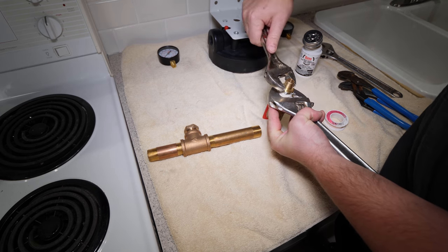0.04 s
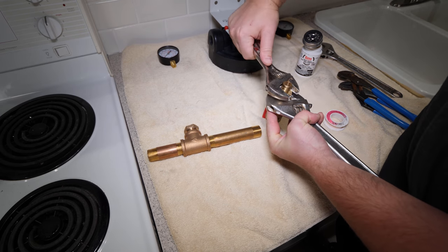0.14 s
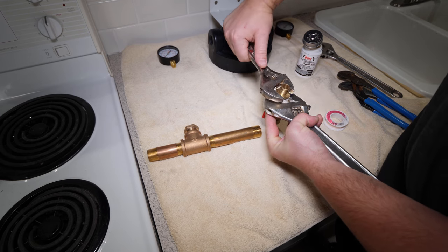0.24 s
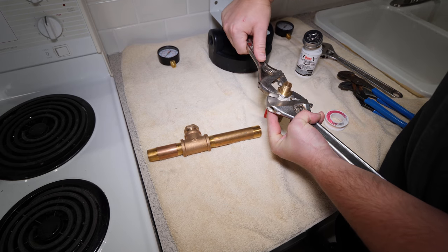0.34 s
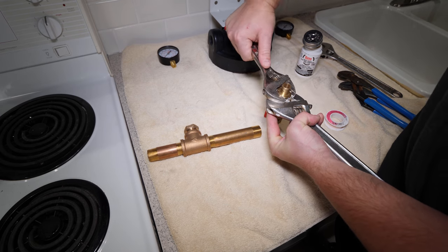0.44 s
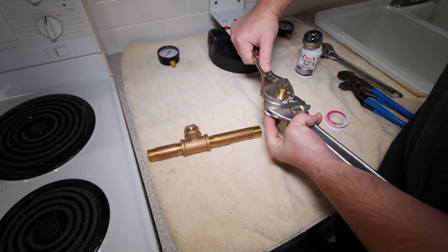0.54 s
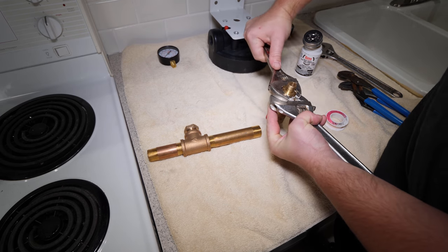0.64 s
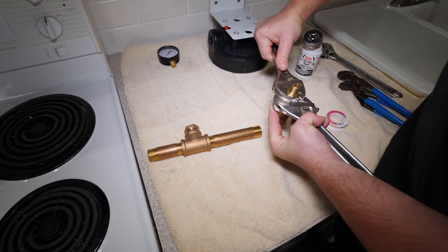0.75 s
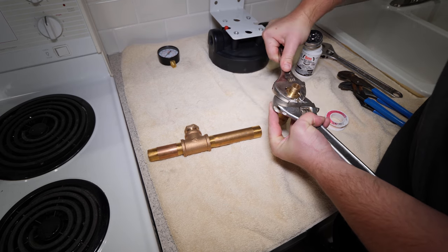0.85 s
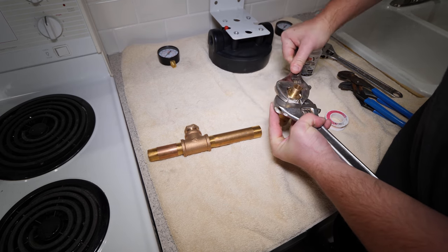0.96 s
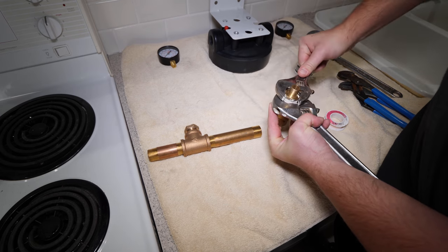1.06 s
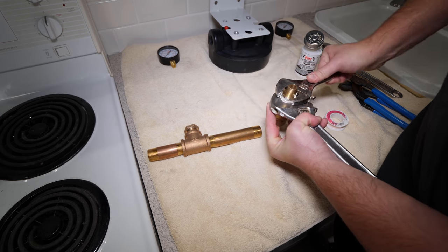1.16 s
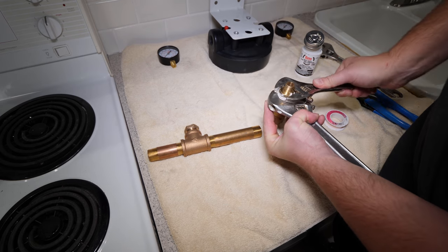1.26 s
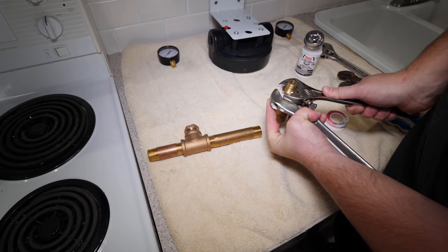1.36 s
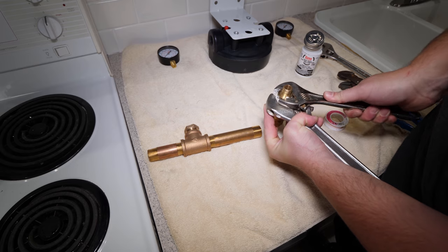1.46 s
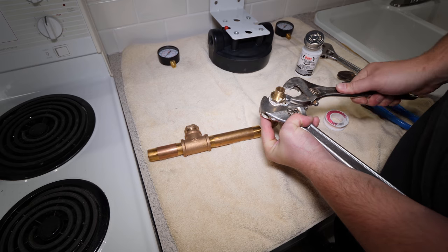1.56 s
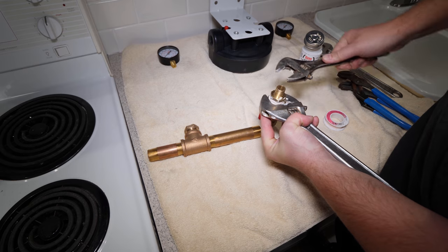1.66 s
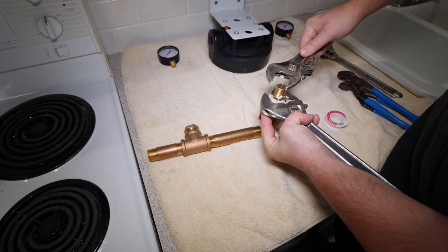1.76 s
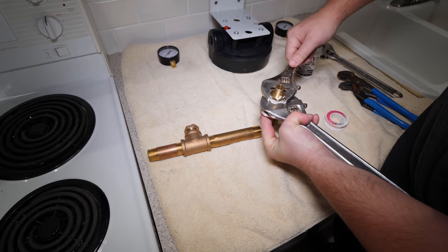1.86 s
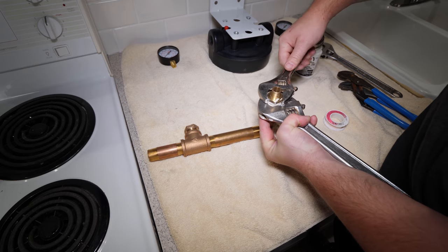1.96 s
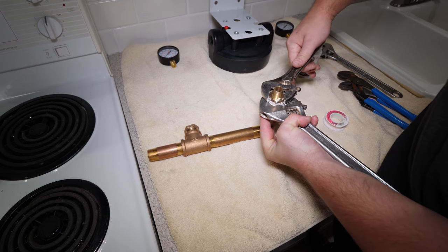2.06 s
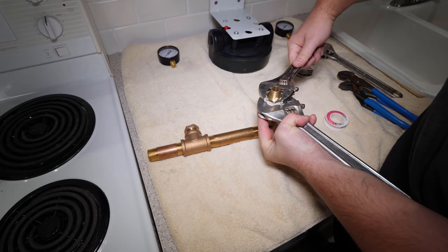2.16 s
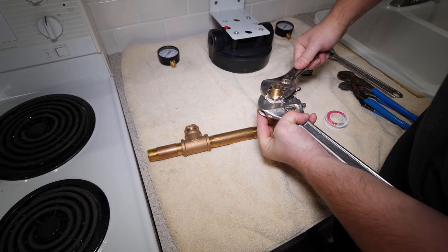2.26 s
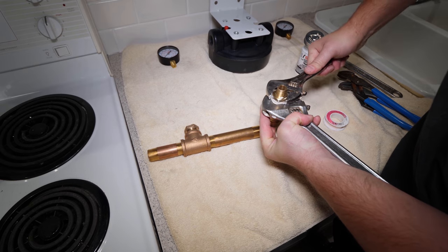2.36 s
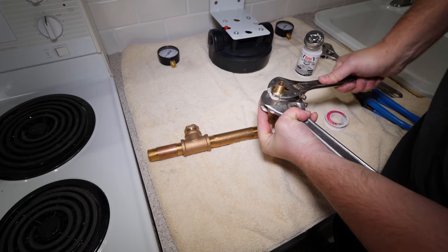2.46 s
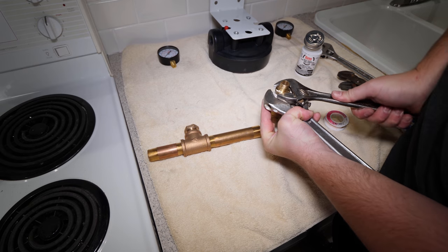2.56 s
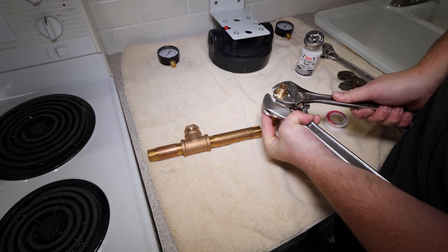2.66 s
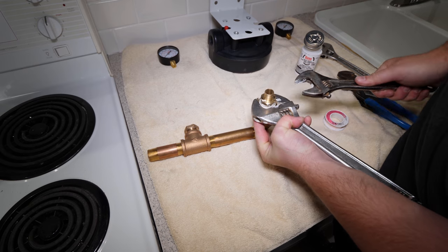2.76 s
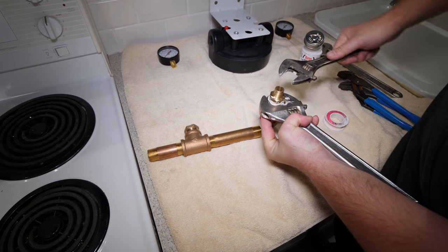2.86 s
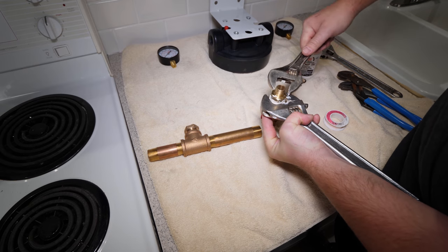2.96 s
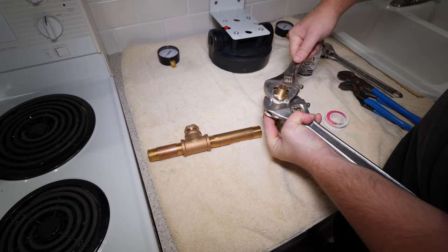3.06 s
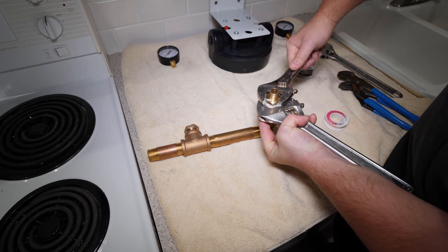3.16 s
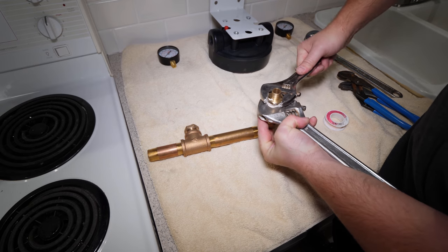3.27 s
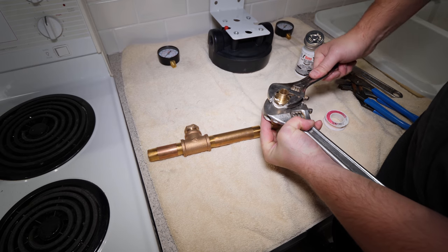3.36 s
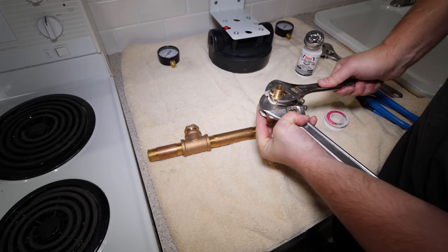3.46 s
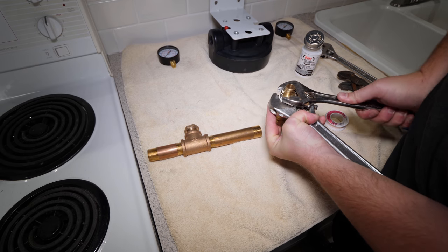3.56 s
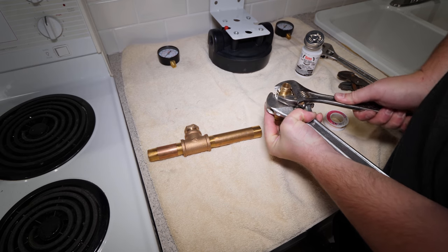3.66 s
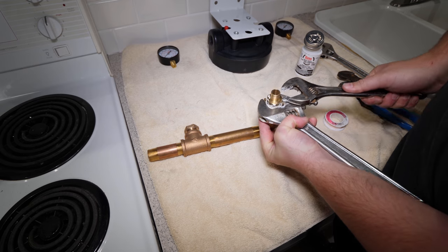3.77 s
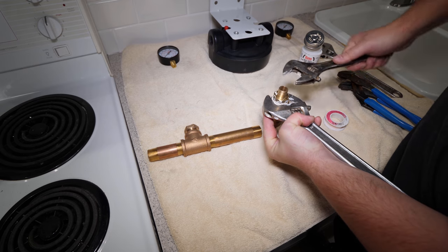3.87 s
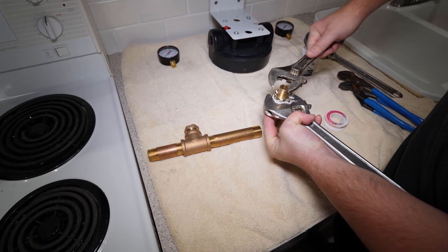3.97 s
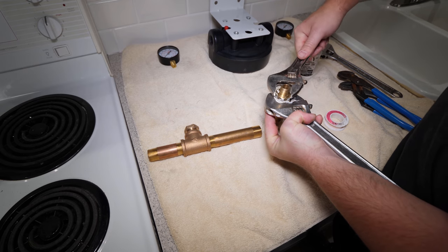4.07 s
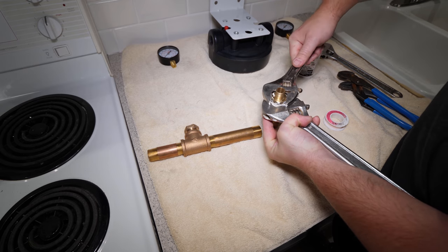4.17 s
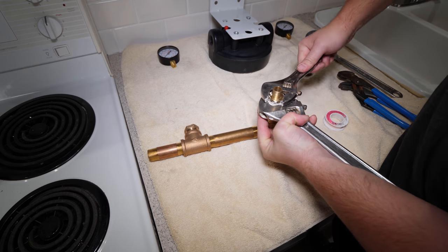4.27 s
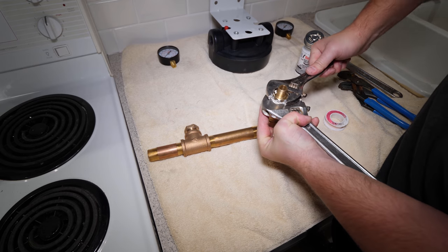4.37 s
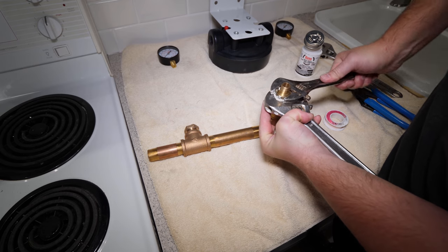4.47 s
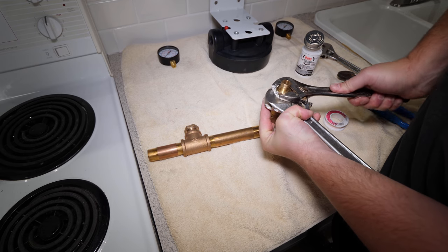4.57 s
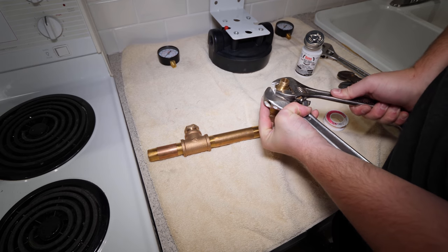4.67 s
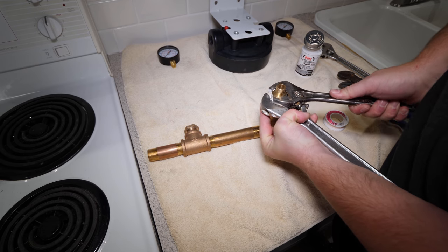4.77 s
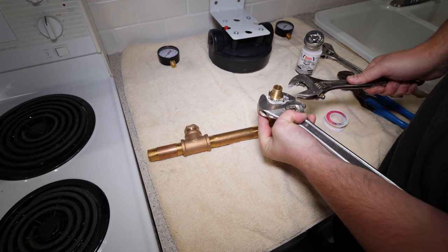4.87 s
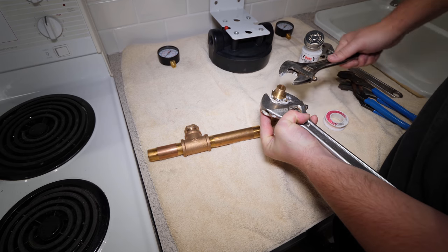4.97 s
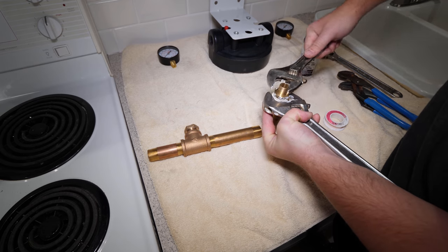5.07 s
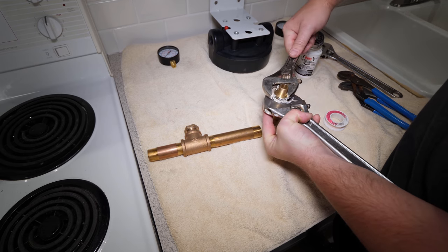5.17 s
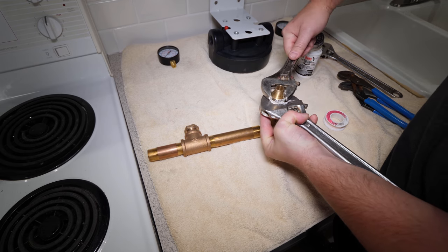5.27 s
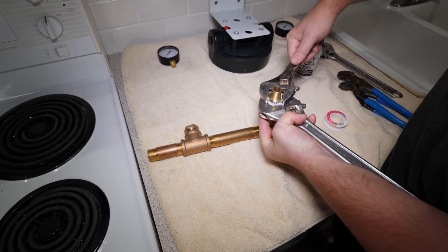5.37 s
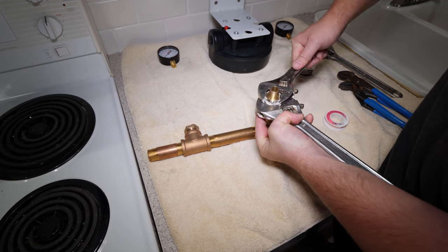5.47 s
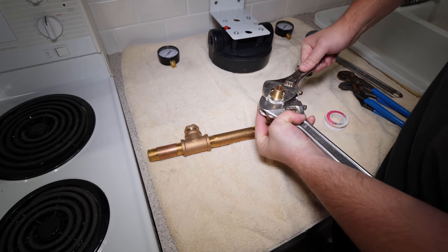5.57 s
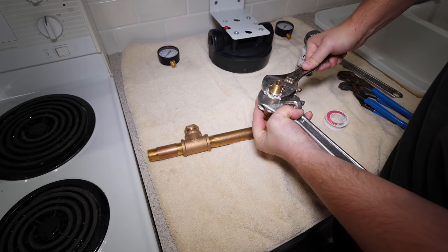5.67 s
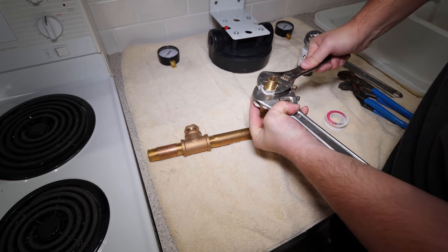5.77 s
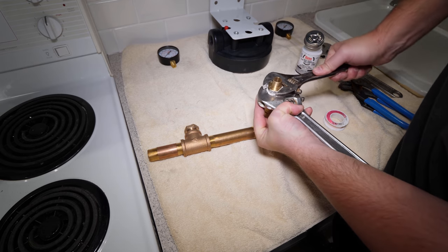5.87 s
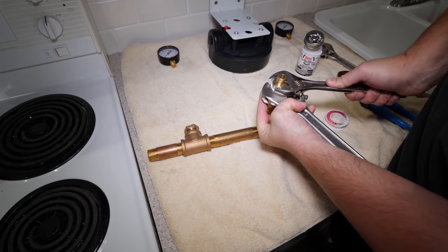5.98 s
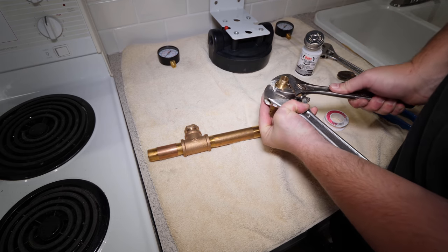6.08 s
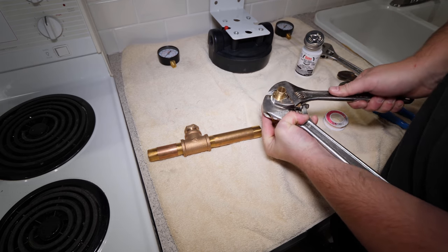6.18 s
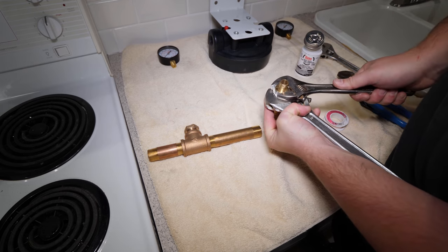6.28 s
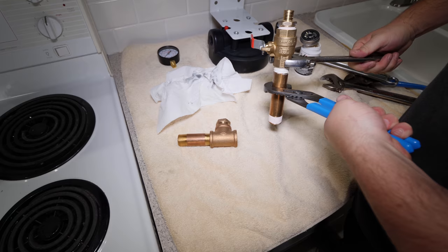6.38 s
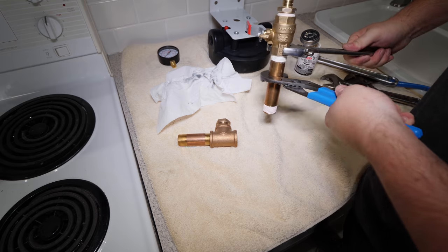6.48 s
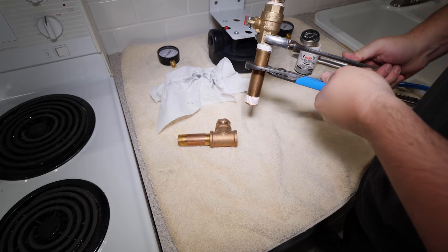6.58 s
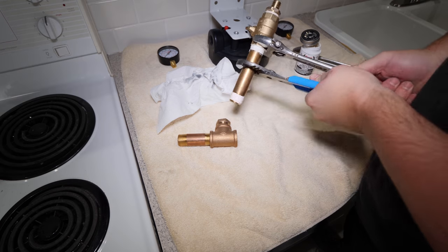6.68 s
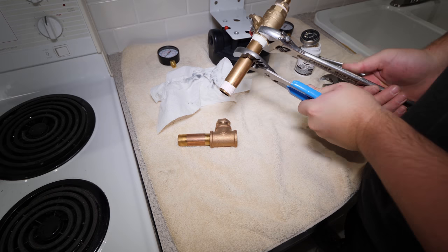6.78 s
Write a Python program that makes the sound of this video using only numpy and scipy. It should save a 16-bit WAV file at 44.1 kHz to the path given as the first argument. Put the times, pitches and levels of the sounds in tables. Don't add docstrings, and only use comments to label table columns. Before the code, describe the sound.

Close stereo sound in a tiled kitchen with faint room tone and a soft appliance hum. A wrench works a hand-damped brass fitting a little right of centre. At 0.14 s a sharp clank with a scrape, then hollow worktop bumps and the hardest crack at 0.36, followed by knocks to 0.5. A freer clink rings thinly at 1.08, with light sliding after. Clattering clusters come at 1.6 and 1.8-2.0, faint ticks and rasps around 2.3-2.8, then a tight group of hard knocks at 3.0-3.1. Dry slides at 3.5-3.8 lead to clacks at 4.0-4.3, small chatter at 4.9-5.3 and a last bright clank at 5.42. Afterwards only faint dragging, a soft bump near 6.2 and tiny ticks at 6.7-6.8, farther right. Hard blows thud through the hollow cupboard, leave short bright tails and momentarily duck the level.

```python
import sys
import numpy as np
from scipy import signal
from scipy.io import wavfile
from scipy.ndimage import uniform_filter1d, minimum_filter1d

SR = 44100
rng = np.random.default_rng(int(sys.argv[2]) if len(sys.argv) > 2 else 0)


def inscribe(sig):
    pcm = np.round(np.clip(np.atleast_2d(sig).T, -1, 1) * 32767)
    wavfile.write(sys.argv[1], SR, pcm.astype(np.int16))


def amplitude_ratio(level_db):
    exponent = np.asarray(level_db, float) / 20
    return 10 ** exponent


N = 301203


def evened(x):
    return x / np.sqrt(np.mean(x ** 2) + 1e-20)


def read(points, hz):
    f, value = np.transpose(points)
    return np.interp(np.log(hz + 1), np.log(f + 1), value)


def add(mix, s, sound):
    part = mix[round(s * SR):][:len(sound)]
    part += sound[:len(part)]


def band(x, lo_hz, hi_hz):
    edges_hz = [lo_hz, min(hi_hz, SR / 2 - 100)]
    return signal.sosfilt(signal.butter(2, edges_hz, "band", fs=SR, output="sos"), x)


def ring(modes, t, luck, spread_db, detune, rise_s):
    hz, db, t60 = np.transpose(modes)[:, :, None]
    level_luck = luck[:len(modes), None]
    pitch_luck = luck[::-1][:len(modes), None]
    envelope = amplitude_ratio(db + spread_db * level_luck - 60 * t / t60)
    x = (envelope * np.sin(2 * np.pi * hz * (1 + detune * pitch_luck) * t)).sum(0)
    x = x * (1 - np.exp(-t / rise_s))
    return x / abs(x).max()


def resonate(x, peaks):
    return evened(sum(amplitude_ratio(db) * signal.lfilter(*signal.iirpeak(hz, hz / w, SR), x) for hz, w, db in peaks))


def drift(span_s, count):
    steps = rng.standard_normal((count, N // 64 + 2))
    steps = uniform_filter1d(steps, size=round(span_s * SR / 64), axis=1)
    at = np.arange(steps.shape[1])
    return np.array([np.interp(np.arange(N) / 64, at, evened(row)) for row in steps])


def wander(x, peaks, bend, flicker_db):
    hz, width, db = np.transpose(peaks)
    moving_hz = hz[:, None] * (1 + bend * drift(.12, count=len(hz)))
    turn = np.exp(2j * np.pi * np.cumsum(moving_hz, axis=1) / SR)
    decay = np.exp(-np.pi * width / SR)
    out = [signal.lfilter([np.sqrt(1 - r)], [1, -r], x / w) * w for r, w in zip(decay, turn)]
    level = amplitude_ratio(db[:, None] + flicker_db * drift(0.05, count=len(hz)))
    return evened((level * np.real(out)).sum(0))


def air():
    # frequency in Hz, level in dB per Hz.
    tone = [(18, -75.5), (30, -51), (217, -14), (368, -9), (533, -9), (659, -8), (772, -8), (979, -9),
            (1380, -19), (1490, -14), (4070, -20.5), (14800, -25.5), (16500, -24.5)]
    # frequency in Hz, left-right likeness from 0 to 1.
    likeness = [(60, 0.89), (240, 1.0), (950, 0.93), (3770, 0.26), (15000, 0.8)]
    # frequency in Hz, level in dB.
    appliance = [(177.6, -83), (376.8, -85.5), (651.4, -83.5)]
    tone_db = -69.5
    frames, hz = N // 256 + 5, np.fft.rfftfreq(1024, 1 / SR)
    a, b, c, d, patches = rng.standard_normal((frames, 513, 5)).T
    patches = uniform_filter1d(patches, size=12, axis=0)
    patches = evened(uniform_filter1d(patches, size=14, axis=1))
    same = np.clip(read(likeness, hz), -1, 1)[:, None]
    left = a + 1j * b
    right = same * left + np.sqrt(1 - same ** 2) * (c + 1j * d)
    z = np.array([left, right]) * amplitude_ratio(read(tone, hz)[:, None] + 1.8 * patches)
    hiss = evened(signal.istft(z, nperseg=1024, noverlap=768)[1][:, :N])
    waver = rng.standard_normal(N)
    hum = sum(amplitude_ratio(db) * resonate(waver, [(f, 6.0, 0)]) for f, db in appliance)
    return amplitude_ratio(tone_db) * hiss + hum


def kitchen(x, shared):
    # frequency in Hz, reverberation t60 in seconds.
    decay = [(100, 0.61), (500, 0.36), (1500, 0.44), (3000, 0.42), (6000, 0.39), (11000, 0.31),
             (16000, 0.25)]
    taps = np.zeros((3, SR))
    slots = np.arange(300, SR - 20, 20)
    at = slots + rng.integers(0, 20, (3, len(slots)))
    np.put_along_axis(taps, at, rng.choice([-1., 1.], at.shape), 1)
    hz, t, z = signal.stft(taps, SR, nperseg=256)
    tail = signal.istft(z * amplitude_ratio(-60 * t / read(decay, hz)[:, None]), SR, nperseg=256)[1]
    tail = shared * tail[2] + np.sqrt(1 - shared ** 2) * tail[:2]
    return signal.fftconvolve(x[None], tail / np.linalg.norm(tail[0]), axes=1)[:, :N]


def counter():
    # start in seconds, hollow panel, low thud and board levels in dB.
    passed_on = [(0.054, -52.5, -60, -53), (0.137, -34, -52, -38), (0.159, -41.5, -54.5, -44.5),
                 (0.353, -44.5, -44, -53.5), (0.448, -42.5, -56.5, -41), (0.487, -47.5, -73.5, -54),
                 (1.609, -61.5, -77, -60), (1.837, -54, -68.5, -53), (1.876, -41.5, -64, -35.5),
                 (1.995, -49, -58.5, -50), (2.285, -62, -85.5, -51.5), (2.745, -57.5, -63, -56),
                 (3.006, -54, -84, -71), (3.038, -54.5, -84, -46), (3.083, -49, -77.5, -48.5),
                 (3.111, -41.5, -57, -38.5), (3.774, -64, -74, -63), (4.016, -56, -70.5, -41),
                 (4.071, -55, -68, -46.5), (4.135, -56, -65.5, -44), (4.257, -53.5, -58, -50),
                 (4.896, -59.5, -76, -56.5), (5.182, -51, -64.5, -44.5), (5.275, -56, -62.5, -46),
                 (5.337, -51, -60, -45.5), (5.417, -41, -55, -64), (0.958, -56, -76, -71),
                 (6.708, -66, -83, -63.5)]
    # start in seconds, hollow panel and low thud levels in dB.
    bumps = [(0.106, -52.5, -67), (0.199, -72, -66), (0.284, -43.5, -57.5), (0.321, -43.5, -56.5),
             (0.339, -31.5, -61), (0.523, -43, -64), (0.564, -78, -61.5), (0.855, -48.5, -70),
             (0.978, -62, -71.5), (2.029, -47, -60), (2.513, -63, -67), (2.582, -58.5, -80.5),
             (3.219, -57, -63.5), (4.844, -59, -73.5), (6.2, -77, -75)]
    # frequency in Hz, level in dB, t60 in seconds.
    panel_modes = [(600.5, -0.21, 0.073), (660.5, -1.8, 0.075)]
    thud_modes = [(137, -5.5, 0.092), (212.8, 0, 0.092), (248.5, 5.5, 0.063), (326, 1, 0.084),
                  (432, 2, 0.078)]
    board_modes = [(880, -3, .022), (1200, -3, .018), (1600, 0, .02), (1950, -1, .018)]
    padded_db = -16.5
    out, t = np.zeros(N), np.arange(8000) / SR
    knocks = sorted(passed_on + [(s, panel_db, thud_db, panel_db + padded_db) for s, panel_db, thud_db in bumps])
    luck = rng.standard_normal((len(knocks), 8))
    for (s, panel_db, thud_db, board_db), z in zip(knocks, luck):
        panel = amplitude_ratio(panel_db) * ring(panel_modes, t, z, 11.0, 0.013, 0.002)
        thud = amplitude_ratio(thud_db + 9.5) * ring(thud_modes, t, z, 0.94, .07, 0.041)
        board = amplitude_ratio(board_db + 10.0) * ring(board_modes, t, z, 0.37, 0.071, 0.00075)
        add(out, s, panel + thud + board)
    return out


def slides():
    # full contact in seconds, hold in seconds, handle hum, jaw rasp and fine hiss levels in dB.
    strokes = [(0.121, .01, -39.5, -45, -59.5), (0.295, 0.075, -43.5, -55.5, -59),
               (1.132, 0.13, -63, -57, -65.5), (1.296, 0.13, -67.5, -72, -70),
               (1.544, 0.066, -65.5, -77.5, -68.5), (2.443, 0.043, -68, -60, -62),
               (2.496, 0.011, -76, -49, -63), (2.548, 0.056, -61, -56, -59.5),
               (2.747, 0.0066, -66, -58, -64.5), (2.829, 0.0046, -57, -61.5, -82),
               (3.463, 0.0055, -52, -47.5, -56), (3.503, 0.07, -54.5, -50, -62),
               (3.624, 0.036, -69, -72.5, -66), (3.773, .015, -55, -64.5, -63.5),
               (3.753, 0.28, -66, -67, -76), (4.183, .005, -38.5, -57, -64.5),
               (4.495, 0.085, -70, -60, -66.5), (5.143, 0.0041, -41, -52.5, -77),
               (5.23, 0.093, -45.5, -76, -69), (5.787, 0.22, -67.5, -70, -77),
               (6.099, 0.22, -81, -73.5, -92), (6.724, 0.063, -72, -65, -68.5),
               (6.798, .03, -75, -64, -64.5)]
    # frequency in Hz, width in Hz, level in dB.
    rasp_peaks = [(3750, 110, -2), (4150, 90, 1), (5050, 120, -4), (5550, 90, 0)]
    hiss_peaks = [(6950, 100, -3), (7600, 100, -2), (8600, 70, 3), (9900, 80, 0), (12200, 120, -3),
                  (13300, 120, -6)]
    grip_db_per_s, let_go_db_per_s = 329.5, 257.5
    t = np.arange(N) / SR
    grain = rng.standard_normal(N)
    catch = amplitude_ratio(1.5 * np.minimum(rng.exponential(1, N), 3.5))
    catch = catch * (rng.random(N) < 900 / SR)
    slips = grain * (0.5 + catch)
    slips = evened(slips * amplitude_ratio(1.6 * drift(.006, count=1)[0]))
    hum = wander(slips, [(2600, 100, -2), (2350, 160, -10.5)], 0.0092, 3.6)
    rasp = wander(slips, rasp_peaks, .015, 4.0) + .4 * evened(band(slips, 3200, 8000))
    hiss = wander(slips, hiss_peaks, .008, 6.0) + .8 * evened(band(slips, 6500, 16000))
    power = np.zeros((3, N))
    for s, hold, *levels_db in strokes:
        loose_db = grip_db_per_s * np.maximum(s - t, 0) + let_go_db_per_s * np.maximum(t - s - hold, 0)
        power += amplitude_ratio(2 * np.array(levels_db))[:, None] * amplitude_ratio(-2 * loose_db)
    return amplitude_ratio(-9.5) * (np.sqrt(power) * (hum, rasp, hiss)).sum(0)


def rings():
    # start in seconds, frequency in Hz, level in dB.
    loose = [(0.139, 11560, -24), (0.16, 11585, -22.5), (0.16, 4840, -24), (0.153, 7900, -30),
             (0.16, 10330, -29), (0.355, 6740, -19), (0.355, 10100, -20.5), (0.355, 11800, -24.5),
             (0.355, 4830, -14), (0.45, 5170, -24), (0.49, 2830, -30.5), (0.496, 5140, -27),
             (1.645, 4823, -30.5), (1.645, 7820, -33), (1.62, 3280, -30), (1.645, 10170, -37),
             (1.826, 4880, -24.5), (1.836, 4840, -22.5), (1.826, 7780, -24), (1.836, 5800, -33.5),
             (1.836, 10034, -31.5), (1.836, 11500, -26), (1.908, 5700, -30), (1.895, 4930, -27.5),
             (2.286, 2283, -38), (2.286, 4300, -40.5), (2.93, 7400, -43), (2.93, 7040, -44.5),
             (3.01, 4823, -32.5), (3.01, 11600, -24), (3.042, 7300, -34), (3.042, 10100, -30.5),
             (3.042, 11700, -26), (3.116, 5700, -26.5), (3.116, 3680, -29), (4.018, 7924, -31),
             (4.018, 10270, -29), (4.025, 12446, -25), (4.018, 4750, -33), (4.071, 5650, -30),
             (4.071, 7924, -36.5), (4.071, 10150, -39), (4.14, 3740, -33), (4.14, 5685, -43),
             (4.26, 5470, -47), (4.9, 3156, -30.5), (4.906, 6374, -42), (4.906, 4880, -33.5),
             (4.906, 7830, -42), (5.093, 3170, -36.5), (5.093, 4960, -35.5), (5.093, 6158, -42.5),
             (5.277, 7235, -34.5), (5.277, 11400, -30.5), (5.277, 4850, -30), (5.338, 3540, -34),
             (5.338, 7666, -41), (5.338, 10140, -30.5), (5.42, 3700, -23), (5.42, 5770, -22)]
    # start in seconds,
    # frequency in Hz, level in dB, t60 in seconds.
    free = [(3.085, 11500, -23.5, 0.15), (0.355, 3050, -19, .015), (0.355, 9400, -24, .03),
            (1.614, 11500, -26, .05), (0.14, 2720, -24, .04), (5.42, 2690, -29.5, .03),
            (3.085, 5700, -27.5, .02), (1.942, 3200, -32, 0.016), (2.286, 940, -43.5, 0.04),
            (1.078, 4500, -32, 0.027), (0.161, 2720, -28, .04), (0.322, 596, -37.5, .15),
            (1.078, 7795, -40, 0.27), (1.078, 7149, -45, .2), (1.078, 11025, -51, .15),
            (1.2, 4980, -66.5, .6), (5.42, 1593, -35.5, 0.048), (5.338, 1809, -39, 0.036)]
    loose_t60_s = 0.027
    out, t = np.zeros(N), np.arange(SR // 2) / SR
    for s, hz, db, t60 in [(*row, loose_t60_s) for row in loose] + free:
        cluster = [(hz, 0, t60), (1.008 * hz, -5, t60), (.99 * hz, -8, t60)]
        add(out, s, amplitude_ratio(db) * ring(cluster, t, np.zeros(3), 0, 0, .001))
    return out


def pliers():
    # start in seconds, level in dB.
    clink = (1.076, -17.5)
    # frequency in Hz, level in dB, t60 in seconds.
    modes = [(2236, -14, 0.032), (4180, -11, 0.02), (4520, 3, 0.019), (4970, -32.5, 0.88),
             (5400, -3.5, 0.021), (5730, -3, 0.022), (6900, -12.5, 0.026), (7280, -11, .04),
             (7970, -11, 0.049), (8840, -23, 0.035), (11400, -14.5, 0.026), (12360, -54, .5),
             (14080, -12, 0.03)]
    out, t = np.zeros(N), np.arange(SR // 2) / SR
    crack = band(rng.standard_normal(len(t)) * np.exp(-t / 0.0024), 2000, 12000)
    metal = ring(modes, t, np.zeros(len(modes)), 0, 0, 0.00017)
    add(out, clink[0], amplitude_ratio(clink[1]) * (metal + 0.051 * crack))
    return out


def tools():
    # frequency in Hz, level in dB, t60 in seconds.
    handle_modes = [(2590, 0, .021), (2650, -3, .017), (2540, -6, .017), (2440, -16, .02)]
    jaw_modes = [(3280, -20, .01), (4850, -24, .012), (5820, -22, .008), (6400, -22, .008)]
    nut_modes = [(7800, -17, .008), (10100, -17, .008)]
    # start in seconds, handle ring in dB, jaw in dB, jaw pitch in Hz, nut in dB.
    on_rim = [(0.139, -12.5, -11, 5020, -10.5), (0.153, -36.5, -30, 4900, -20),
              (0.16, -25, -21, 4660, -18.5), (1.6137, -43.5, -19, 3170, -8.5),
              (1.631, -51, -25, 4960, -38.5), (1.823, -49.5, -33.5, 4500, -33.5),
              (1.825, -47, -16, 5000, -11.5), (1.8355, -35.5, -23.5, 4900, -17),
              (2.929, -34, -32.5, 6570, -25.5), (2.9915, -35.5, -28, 4770, -19),
              (3.01, -27, -23, 5420, -13.5), (3.034, -28, -37.5, 4600, -31),
              (3.042, -25.5, -16, 5000, -10.5), (3.083, -19, -6, 4500, -1.5),
              (3.092, -35.5, -23.5, 3800, -23.5), (3.114, -19, -17.5, 4530, -34),
              (4.018, -16, -14, 2930, -9), (4.0245, -37, -27, 5670, -13), (4.071, -36, -17, 5190, -26),
              (5.276, -28.5, -17, 5200, -20), (6.71, -61, -57, 5400, -62)]
    on_body = [(0.033, -51.5, -36, 3000, -54.5), (0.056, -44.5, -37, 4800, -35),
               (0.341, -37, -33, 4840, -49), (0.4505, -32, -14, 5050, -15.5), (0.496, -50, -25, 5240, -45),
               (1.572, -63, -54.5, 5270, -76), (1.619, -47.5, -25, 3300, -30.5),
               (1.6215, -54, -31, 3380, -23.5), (1.648, -40.5, -32, 4870, -24),
               (1.6443, -42, -28, 4860, -22), (1.89, -40, -16, 5160, -29.5), (2.402, -89, -39.5, 3830, -78),
               (2.597, -52, -48.5, 4400, -44), (2.752, -44, -44, 5300, -55), (3.434, -50, -29, 3740, -68),
               (3.542, -65, -37.5, 4200, -45), (3.7975, -38, -44, 4970, -47),
               (3.948, -34.5, -31.5, 5850, -28), (2.479, -75, -48.5, 5000, -60),
               (4.931, -33.5, -38, 5000, -31.5), (4.846, -37.5, -45, 3100, -56),
               (4.898, -54, -27, 3150, -20.5), (4.905, -35, -26.5, 4900, -24.5),
               (4.925, -35, -33, 4800, -31.5), (5.097, -58, -33.5, 5100, -34.5),
               (5.285, -28.5, -29, 4870, -32)]
    on_flat = [(0.355, -15, 4, 4760, 6.5), (1.877, -41, -6.5, 5570, -8), (1.8945, -29, -15, 5140, -27.5),
               (1.9075, -59, -20.5, 5600, -40), (1.941, -36.5, -24, 4920, -40),
               (1.985, -41.5, -21.5, 5910, -25), (2.5, -67, -40, 3650, -65), (2.515, -65, -42, 4790, -64),
               (2.9, -55.5, -54.5, 4700, -45.5), (2.906, -54, -46, 4770, -44), (1.46, -85, -75, 4980, -64),
               (4.089, -32, -46.5, 4600, -32.5), (4.14, -25, -18, 5200, -20.5),
               (3.9395, -36.5, -39.5, 5230, -39), (4.26, -39.5, -21.5, 5400, -21.5),
               (4.91, -46, -29, 5120, -26.5), (5.093, -34, -30.5, 3050, -33.5),
               (5.337, -24, -20.5, 5150, -20.5), (6.815, -81, -51, 3130, -61), (6.824, -72, -37, 3400, -68)]
    on_corner = [(0.9715, -71, -54, 5180, -57), (1.565, -83.5, -60, 5400, -58),
                 (1.74, -69.5, -45, 4820, -43), (2.2, -64, -57, 4500, -63), (2.775, -80, -71, 5030, -60),
                 (4.835, -70, -62, 5000, -57), (5.1, -48, -35, 5160, -45), (5.21, -46, -54, 3280, -59),
                 (0.489, -34.5, -21, 5100, -28), (1.997, -59, -28.5, 5340, -21),
                 (2.285, -30, -28.5, 4220, -33.5), (2.58, -49, -43, 5530, -41.5),
                 (2.727, -65.5, -54.5, 3250, -45), (2.755, -39, -49, 5160, -52.5),
                 (3.772, -43.5, -46, 5370, -55), (4.489, -59.5, -56, 4240, -53),
                 (0.292, -51.5, -42, 4800, -48.5), (4.874, -57.5, -42, 3100, -56),
                 (5.183, -37, -28.5, 2980, -46), (5.185, -30, -31.5, 5070, -39.5),
                 (5.419, -24.5, -5, 5184, -1.5)]
    extra_ticks = [
        (3.1176, -32, -25, 4300, -30),
        (4.2522, -60, -52, 4500, -44),
        (0.3605, -35.5, -20, 5000, -20),
        (4.1375, -30, -24.5, 5900, -30.5),
        (2.4, -60, -44, 3400, -58),
        (4.0485, -46, -40, 4800, -34.5),
        (3.22, -50, -44, 4400, -52),
        (0.556, -52, -40, 3200, -56),
    ]
    flat_hz = 9950
    places = (on_rim, 11350), (on_body, 7710), (on_flat, flat_hz), (on_corner, 11800)
    out, t = np.zeros((2, N)), np.arange(3000) / SR
    blows = sorted((*row, nut_hz) for rows, nut_hz in places for row in rows)
    luck = rng.standard_normal((len(blows), 16 + 800))
    blows = blows + [(*row, flat_hz) for row in extra_ticks]
    luck = np.vstack([luck, -luck])
    snap = np.arange(len(t)) == 30
    burst = np.exp(-t[:800] / 0.0011) * (1 - np.exp(-t[:800] / 0.0026))
    for (s, handle_db, jaw_db, jaw_hz, nut_db, nut_hz), z in zip(blows, luck):
        crack = np.pad(z[16:] * burst, (0, len(t) - 800))
        clatter = amplitude_ratio(7.0 + .38 * (max(jaw_db, nut_db) + 25))
        crack = crack + .05 * clatter * snap
        crack = np.array([crack, np.linalg.norm(crack) * snap])
        handle = ring(handle_modes, t, z[:16], 3.0, .008, .0016) + .4 * band(crack, 1500, 3100)
        jaw = ring([(jaw_hz, 0, .005)] + jaw_modes, t, z[:16], 5.0, .025, .0004)
        jaw = jaw + clatter * (band(crack, 0.53 * jaw_hz, 1.26 * jaw_hz) + 1.35 * band(crack, 2160, 7800))
        nut = ring([(nut_hz, 0, .006)] + nut_modes, t, z[2:16], 5.0, .012, .0003)
        nut_clatter = band(crack, 0.7 * nut_hz, 1.1 * nut_hz) + 1.5 * band(crack, 5460, 13680)
        nut = nut + 2.9 * clatter * nut_clatter
        blow = amplitude_ratio(handle_db) * handle
        blow = blow + amplitude_ratio(jaw_db) * jaw / abs(jaw[0]).max()
        blow = blow + amplitude_ratio(nut_db) * nut / abs(nut[0]).max()
        add(out.T, s - .0006, blow.T)
    return out


def scene():
    # time in seconds, left minus right in dB.
    where = [
        (0, -0.5),
        (2.901, -5),
        (3.1, -4),
        (3.6, -5.5),
        (4.1, -4),
        (5.401, -1.8),
        (6.8, -6),
    ]
    # delay in seconds, left and right levels in dB.
    echoes = [
        (.0011, -15.5, -29),
        (.0016, -17, -29),
        (.0047, -10.5, -27),
        (.0052, -19, -12),
        (.0085, -17, -20),
    ]
    blows, spread = tools()
    clink = pliers() + rings()
    drag = slides()
    wood = counter()
    lean_db = np.interp(np.arange(N) / SR, *np.transpose(where))
    lean = amplitude_ratio(lean_db / 2 * np.array([[1], [-1]]))
    near = (blows + clink) * lean
    for s, left_db, right_db in echoes:
        add(near[0], s, amplitude_ratio(left_db) * (blows + clink))
        add(near[1], s, amplitude_ratio(right_db) * (blows + clink))
    wet = amplitude_ratio(-11.5) * kitchen(spread + clink + drag + amplitude_ratio(4.5) * wood, shared=.8)
    edge_hz = 15950
    steady = wet + air() + drag * lean
    steady = signal.oaconvolve(steady, signal.firwin(511, edge_hz, fs=SR)[None], "same")
    return near + wood + steady


def top_cut(x):
    return signal.sosfilt(signal.butter(12, 16970, fs=SR, output="sos"), x)


def record(dry):
    # start in seconds, peak in dB.
    overloads = [
        (0.355, -34),
        (0.449, -62),
        (1.613, -41),
        (1.876, -40),
        (3.009, -47),
        (3.039, -48.5),
        (3.082, -41),
        (4.016, -46),
        (5.419, -44),
    ]
    x = signal.sosfilt(signal.butter(4, 95, "high", fs=SR, output="sos"), dry)
    peak_db = 20 * np.log10(-minimum_filter1d(-abs(x).max(0), size=61) + 1e-9)
    fall = np.arange(N) * 304.0 / SR
    over_db = np.maximum(np.maximum.accumulate(peak_db + fall) - fall + 12.0, 0)
    x = x / amplitude_ratio(uniform_filter1d(over_db, size=31))
    pops = np.zeros((2, N))
    kick = np.hanning(24)
    for k, (s, db) in enumerate(overloads):
        lean = .33 * (-1) ** (k // 2)
        add(pops[0], s, (1 + lean) * amplitude_ratio(db + 14.0) * kick)
        add(pops[1], s, (1 - lean) * amplitude_ratio(db + 13.5) * kick)
    mix = signal.oaconvolve(x + pops, signal.firwin(255, 16800, fs=SR)[None], "same")
    return top_cut(mix)


dry = scene()
out = record(dry)
inscribe(out)
```